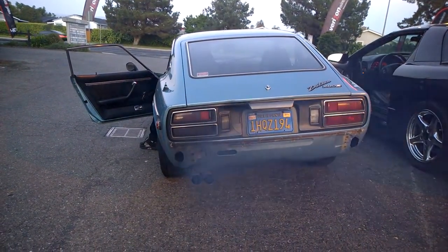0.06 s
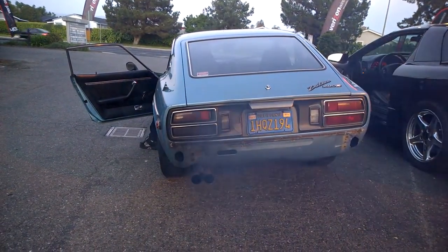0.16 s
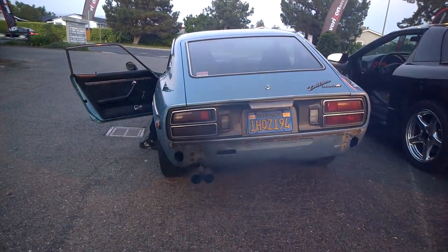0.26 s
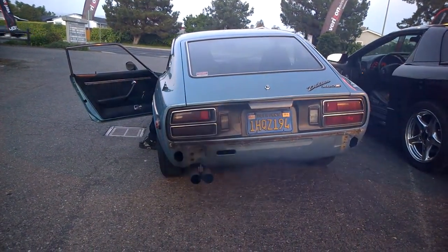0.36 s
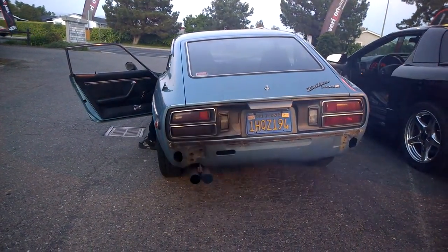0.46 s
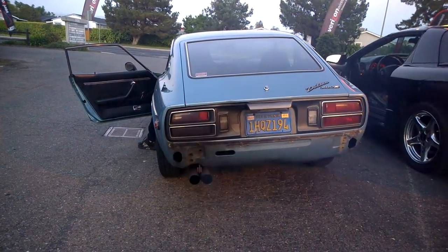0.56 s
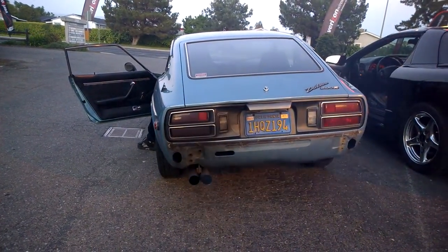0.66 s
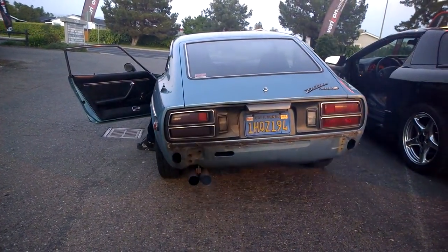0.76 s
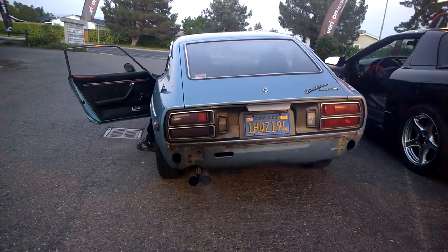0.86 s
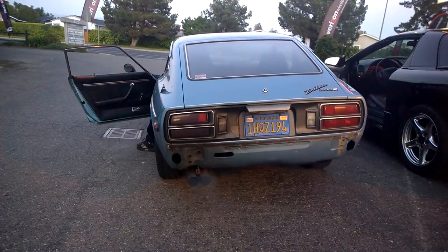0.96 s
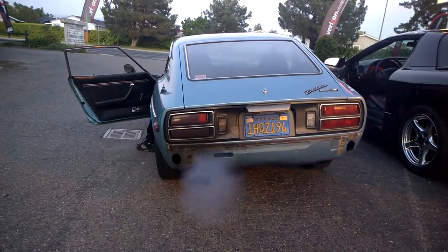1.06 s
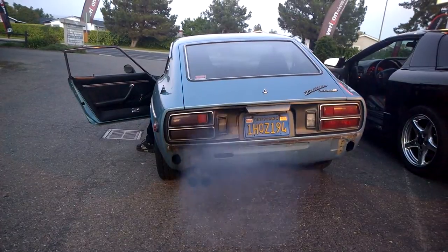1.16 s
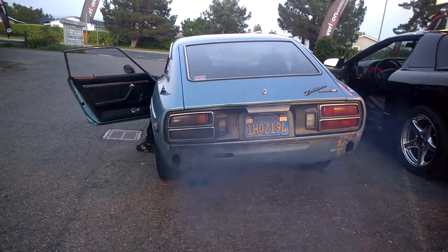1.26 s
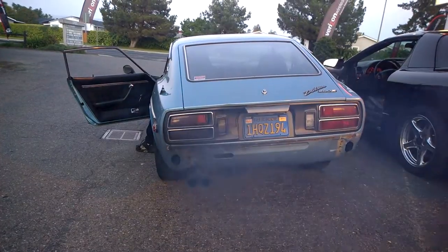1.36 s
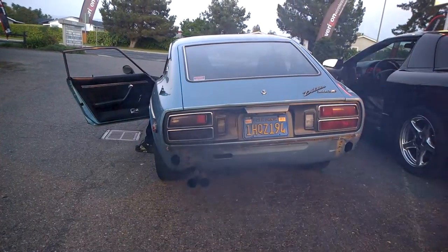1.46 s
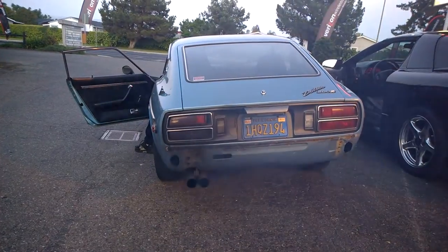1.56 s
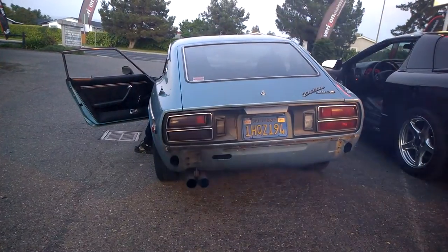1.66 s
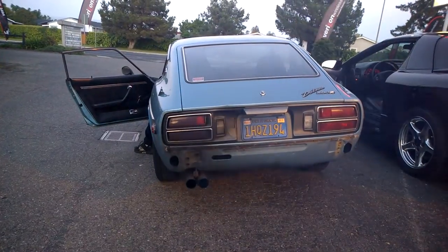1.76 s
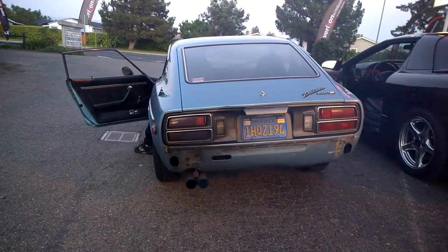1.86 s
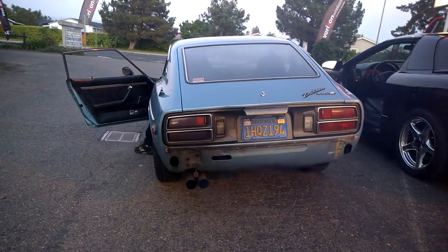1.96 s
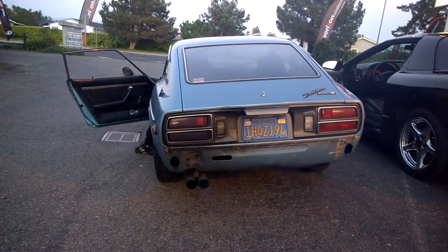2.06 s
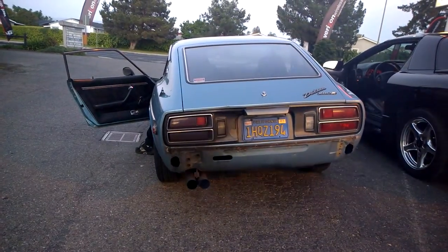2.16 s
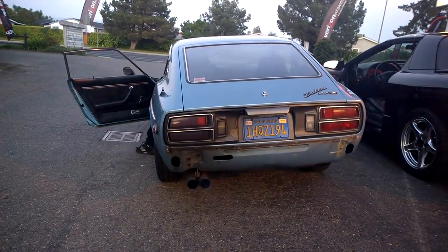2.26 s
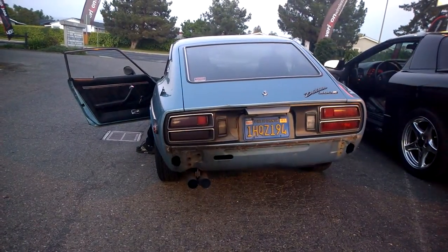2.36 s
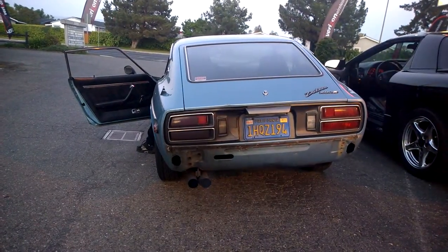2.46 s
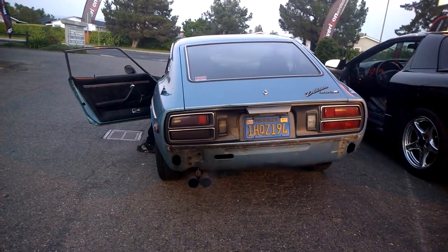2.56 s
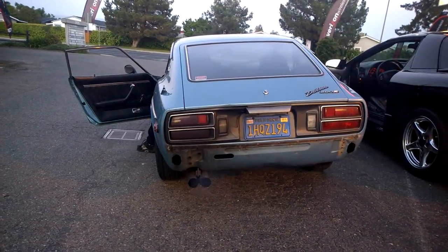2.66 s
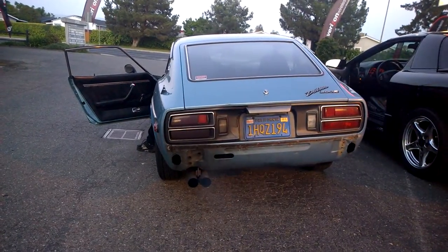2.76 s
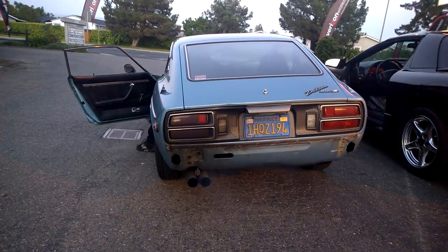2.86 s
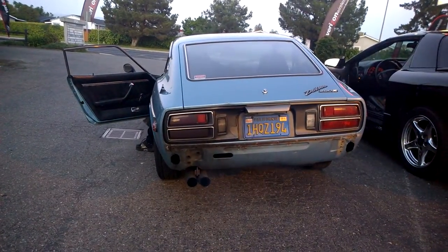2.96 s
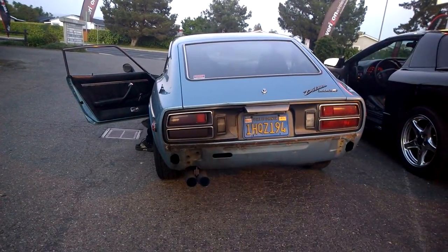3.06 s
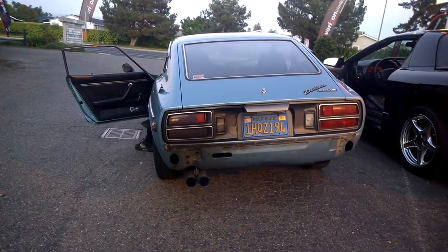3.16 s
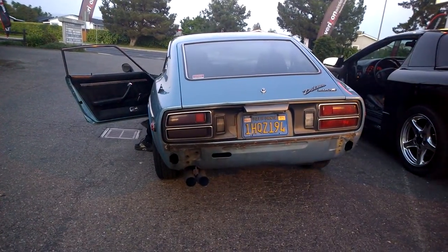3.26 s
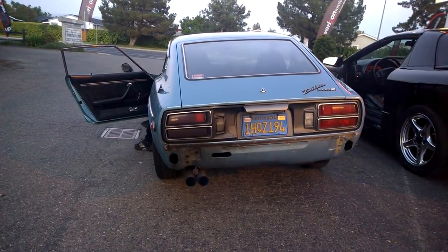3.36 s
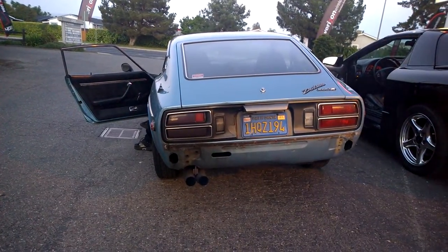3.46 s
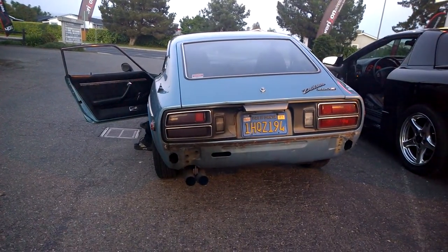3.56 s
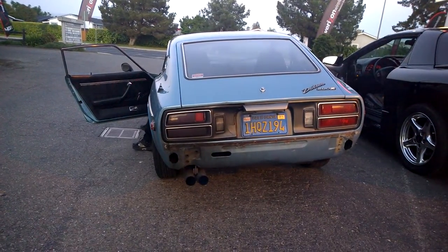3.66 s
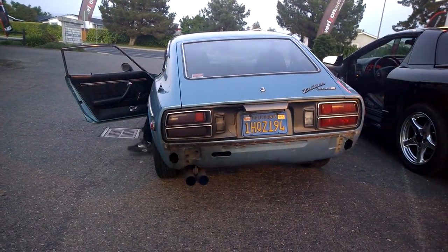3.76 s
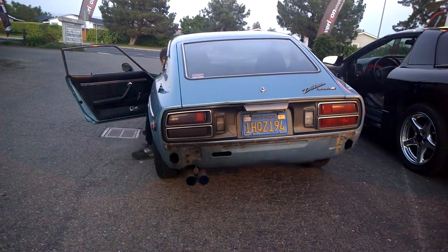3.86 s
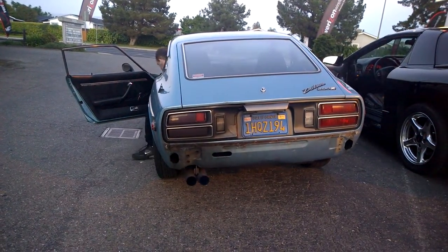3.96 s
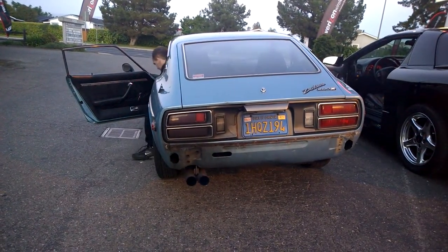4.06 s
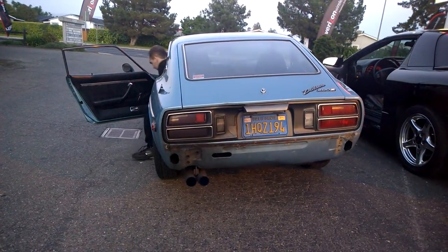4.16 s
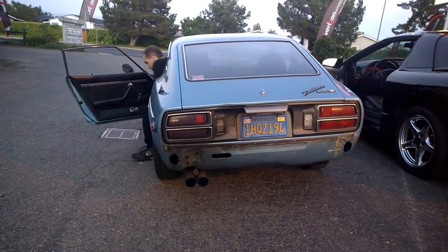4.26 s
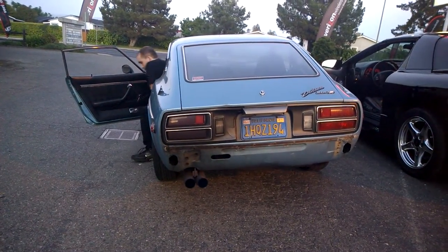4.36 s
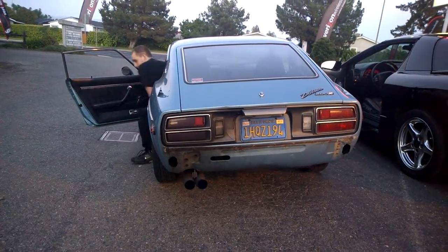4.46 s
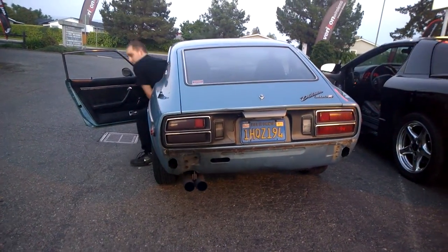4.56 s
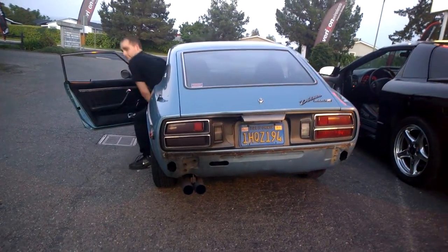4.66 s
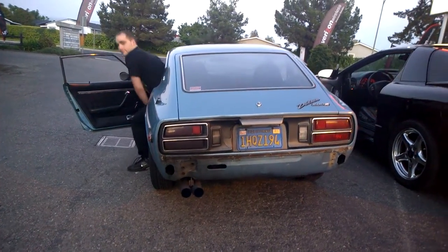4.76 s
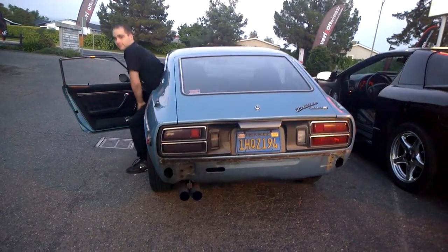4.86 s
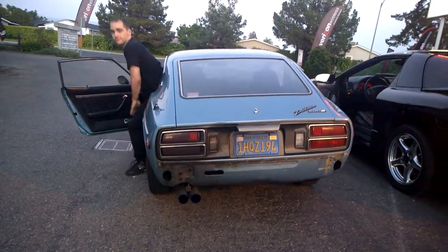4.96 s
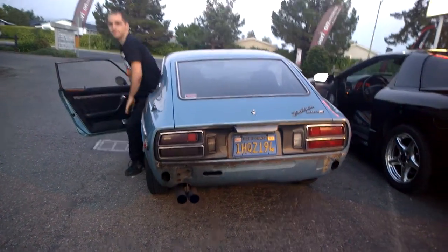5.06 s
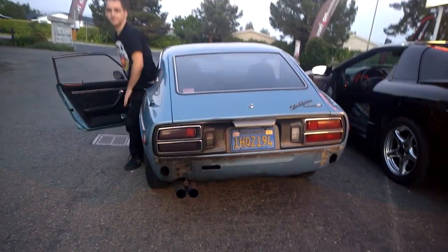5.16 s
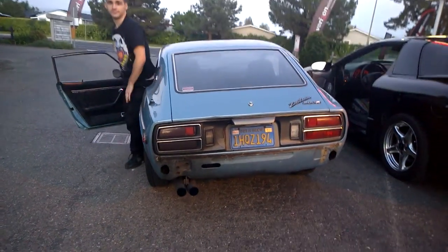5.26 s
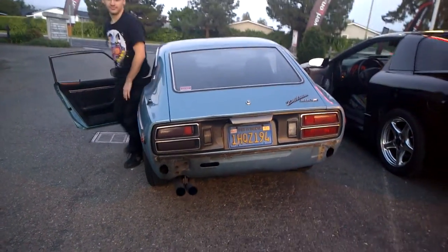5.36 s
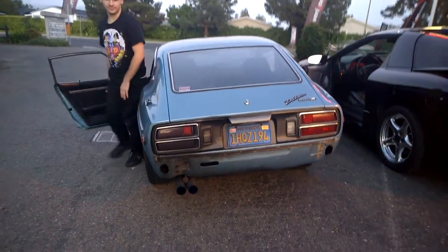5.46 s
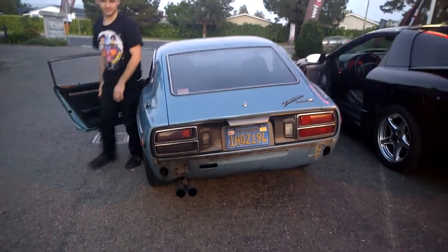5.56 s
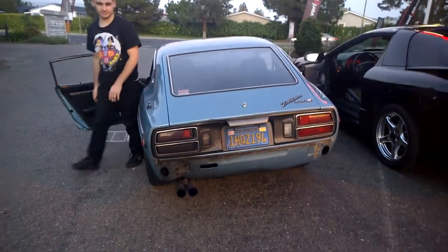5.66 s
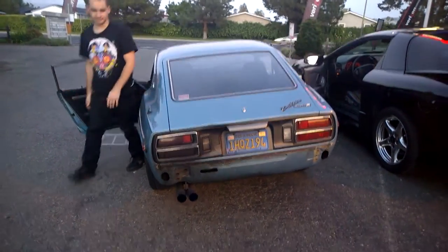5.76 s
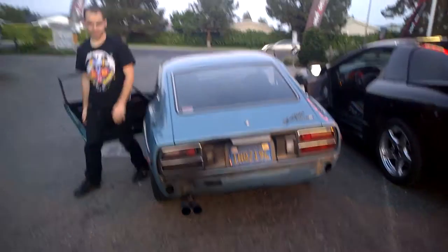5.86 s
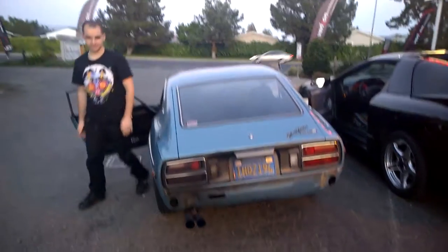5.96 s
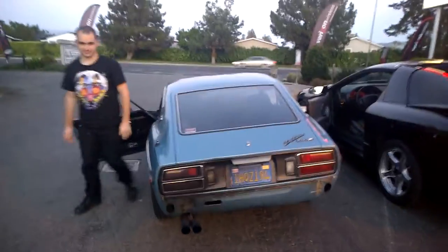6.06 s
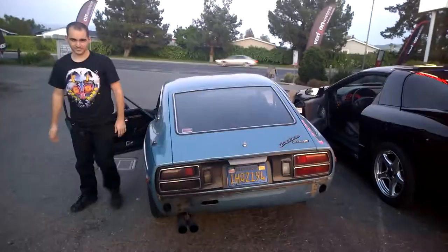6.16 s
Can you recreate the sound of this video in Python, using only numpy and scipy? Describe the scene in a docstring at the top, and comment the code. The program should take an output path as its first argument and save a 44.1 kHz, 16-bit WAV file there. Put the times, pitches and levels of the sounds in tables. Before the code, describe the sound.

Outdoors in a parking area, close behind a car with an open six-cylinder exhaust. At 0 s a rev is already ending with hard thumps and crackly pops until about 0.2 s; its raspy, hollow tone slides down to 0.95 s. A second blip then swells and barks, pitch climbing to about 1.3 s, with gritty tailpipe ringing, chopped gas hiss and a cluster of cracks around 1.15-1.25 s. Two more pops come near 1.45 s. From 1.5 to 2.5 s a smooth drone glides down through resonances. Around 2.6-2.9 s it turns rough, with dull pops and a bright loose rattle peaking near 2.8 s; another pop at 3.4 s. From 3.1 s a deep, lumpy idle throbs, slowing and softening to 6.2 s. Faint bright scuffs tick from 3 s, and a fluttering clothing rustle rises quietly after 5.7 s over bassy outdoor air.

```python
"""Sports car exhaust, parking area

A six-cylinder sports car with an open exhaust, heard from behind: one throttle blip dies away, a second
barks, the engine winds down with a smooth drone and scattered pops, then settles into a slow, lumpy idle.
Crank speed drives order tones, firing pulses that ring pipe resonances, and gas noise gated by the firings.
A loose rattle, scuffs, a rustle of clothing and a quiet outdoor bed are shaped noise."""
import sys
import numpy as np
from scipy import signal
from scipy.fft import rfft, irfft
from scipy.io import wavfile
from scipy.ndimage import uniform_filter1d

SR = 44100
rng = np.random.default_rng(int(sys.argv[2]) if len(sys.argv) > 2 else 0)


def store_wav(level_fs):
    """Save 16-bit WAV to argv[1]."""
    pcm = np.round(np.clip(np.atleast_2d(level_fs), -1, 1) * 32767)
    wavfile.write(sys.argv[1], SR, pcm.T.astype(np.int16))


N = 273420
TIME = np.arange(N) / SR


def from_db(db):
    """Decibels to amplitude gain."""
    return 10 ** (np.asarray(db) / 20)


def summed_db(*gains):
    """Level of unrelated sounds together: their powers add."""
    return 10 * np.log10(sum(g ** 2 for g in gains))


def rms_one(x):
    """Scale to unit power."""
    return x / np.sqrt(np.mean(x ** 2) + 1e-20)


def in_time(rows):
    """Interpolate each column after the time column at every sample."""
    s, *columns = np.transpose(rows)
    return [np.interp(TIME, s, c) for c in columns]


def at_hz(points, hz):
    """Read a spectrum on a log-frequency axis."""
    point_hz, value = np.array(points).T[:2]
    return np.interp(np.log(hz + 1e-3), np.log(point_hz), value)


def butter(x, hz, kind, order=2):
    """Causal Butterworth filter."""
    return signal.sosfilt(signal.butter(order, hz, kind, fs=SR, output="sos"), x)


def drift(hz):
    """Low-passed chance with unit power."""
    return rms_one(butter(rng.standard_normal(N + SR), hz, "low")[SR:])


def evened(x, seconds):
    """Divide by the running RMS to hold the power near 1."""
    power = np.mean(np.atleast_2d(x) ** 2, axis=0)
    running = np.abs(uniform_filter1d(power, int(seconds * SR)))
    return x / np.sqrt(running + 1e-6 * power.mean())


# left-right likeness of noise: freq_hz, likeness_0_to_1
STEREO_LIKENESS = [(100, 1), (500, 0.86), (1000, 0.12), (2000, 0.37), (4000, 0.28), (8000, 0.051),
                   (12000, .1)]


def noise(spectrum):
    """Coloured stereo noise, rolled off at both ends; width follows the likeness of left and right."""
    hz = np.arange(N // 2 + 1) * SR / N
    low_hz, high_hz = spectrum[0][0], spectrum[-1][0]
    skirts = 1 / (1 + (hz / high_hz) ** 12) / (1 + (low_hz / (hz + 1)) ** 4)
    mid, side = rfft(rng.standard_normal((2, N))) * from_db(at_hz(spectrum, hz)) * skirts
    alike = np.clip(at_hz(STEREO_LIKENESS, hz), 0, 1)
    mid = irfft(np.sqrt(1 + alike) * mid, N)
    side = irfft(np.sqrt(1 - alike) * side, N)
    return (mid + side * [[1], [-1]]) / np.std(mid)


def resonate(x, modes, alternate=True):
    """Parallel two-pole resonances; along a pipe their signs alternate."""
    out = 0
    for k, (hz, width_hz, db) in enumerate(modes):
        r = np.exp(-np.pi * width_hz / SR)
        sign = (-1) ** k if alternate else 1
        poles = [1, -2 * r * np.cos(2 * np.pi * hz / SR), r * r]
        ring = signal.lfilter([1, 0, -1], poles, x + 1e-18)
        out = out + sign * from_db(db) * (1 - r * r) / 2 * ring
    return out


def disperse(x, hz, width_hz, count=5):
    """A chain of all-passes: the muffler's chambers hold the tones near hz back."""
    r = np.exp(-np.pi * width_hz / SR)
    a = [1, -2 * r * np.cos(2 * np.pi * hz / SR), r * r]
    return signal.sosfilt([a[::-1] + a] * count, x)


def clicks(seconds, sizes):
    """Single-sample impulses."""
    out = np.zeros(N)
    out[np.clip(np.round(seconds * SR).astype(int), 0, N - 1)] = sizes
    return out


def play(seconds, db, shape):
    """Repeat one peak-1 shape at given moments and levels."""
    return signal.fftconvolve(clicks(seconds, from_db(db)), shape / np.abs(shape).max())[:N]


def envelope(start_s, attack_s, hold_s, release_s, curve=1):
    """Rise, hold and exponential release; top 1."""
    age = TIME - start_s
    rise = np.clip(age / attack_s, 0, 1) ** curve
    return rise * np.exp(-np.maximum(age - attack_s - hold_s, 0) / release_s)


# outdoor bed spectrum: freq_hz, density_db_per_hz
OUTDOOR_SPECTRUM = [(15, -5.5), (35, -5), (100, 0.5), (300, -8), (520, -31.5), (800, -34), (1100, -39),
                    (1500, -52.5), (4000, -57.5), (6500, -57.5), (9000, -78), (16000, -71)]


def outdoor_air():
    """Steady, bass-heavy background noise."""
    return from_db(-37.5) * noise(OUTDOOR_SPECTRUM)


# clothing as the driver walks past: time_s, relative_level_db
RUSTLE_LEVEL = [(5.5, -100), (5.78, -83), (5.95, -82.5), (6.08, -80), (6.2, -74.5)]
# bright rustle spectrum: freq_hz, density_db_per_hz
RUSTLE_SPECTRUM = [(1000, -2.5), (1500, -8), (2300, -2), (3500, -28.5), (4800, -10.5), (5500, 8.5),
                   (6300, -12.5), (8000, -33)]
# dull swish of cloth: freq_hz, density_db_per_hz
SWISH_SPECTRUM = [(450, 1), (800, -4.5), (1400, -4.5), (2400, -11.5)]
FLUTTER_HZ, FLUTTER_DB = 16, 4


def clothing():
    """Cloth friction: a fluttering bright rustle over a dull swish."""
    level_db, = in_time(RUSTLE_LEVEL)
    flutter_db = FLUTTER_DB * np.sin(2 * np.pi * FLUTTER_HZ * TIME + drift(5)) + 3 * drift(25)
    rustle = from_db(level_db - 1 + flutter_db) * noise(RUSTLE_SPECTRUM)
    swish = from_db(level_db + 7.5) * noise(SWISH_SPECTRUM)
    return rustle + swish


def ticks(rows, band, length_s, gain_db):
    """Brief swells of bright noise; each swell peaks length_s after its start."""
    s, db = np.transpose(rows)[:2]
    age = TIME[:SR // 10] / length_s
    return play(s, db + gain_db, age * np.exp(-age)) * noise(band)


SHUFFLE_FROM_S, SHUFFLE_DB = 2.9, -65.5   # level before the tick gains


def shuffling(spread_db, count=18):
    """Faint scuffs at loose intervals as the driver climbs out: rows start_s, relative_level_db."""
    when, size = rng.random((count, 2)).T
    s = SHUFFLE_FROM_S + (TIME[-1] - SHUFFLE_FROM_S) * (np.arange(count) + when) / count
    return np.column_stack([s, SHUFFLE_DB + spread_db * (2 * size - 1)])


# level before the tick gains, highest at the peak time
RATTLE_PEAK_S, RATTLE_DB, RATTLE_RISE_DB_PER_S, RATTLE_FALL_DB_PER_S = 2.8395, -58, 11.5, 12


def rattle(phase, spread_db):
    """A loose part ticks once a revolution, strongest at its resonance: rows start_s, relative_level_db."""
    turns = (phase - np.interp(RATTLE_PEAK_S, TIME, phase)) / 3   # three firings a revolution
    s = TIME[np.flatnonzero(np.diff(np.floor(turns)) > 0)]
    late_s = s - RATTLE_PEAK_S
    db = RATTLE_DB - np.maximum(-RATTLE_RISE_DB_PER_S * late_s, RATTLE_FALL_DB_PER_S * late_s)
    return np.column_stack([s, db + spread_db * np.resize(rng.standard_normal(size=200), len(s))])


# clearest scuffs and ticks around the car: start_s, relative_level_db
CLEAR_SCUFFS = [(3.5721, -62), (4.1593, -61.5), (4.257, -60.5), (4.4587, -66), (4.5653, -62),
                (4.6113, -59.5), (4.9444, -62), (5.066, -67), (5.119, -62), (5.3981, -62), (5.6601, -66),
                (6.0505, -63)]
# rattle spectrum: freq_hz, density_db_per_hz
RATTLE_SPECTRUM = [(3000, -20), (4900, -4.5), (6500, -18.5), (7800, 3), (9500, -22), (11800, -8.5),
                   (13800, -21.5), (15500, -12.5)]
# scuff spectrum: freq_hz, density_db_per_hz
SCUFF_SPECTRUM = [(2000, -35), (3700, 0.5), (5400, 3.5), (7000, -9), (10000, -18.5)]


def loose_parts(phase):
    """Noise ticks: the rattle with a buzzing tail, and scuffs with a faint bright edge."""
    knocks = rattle(phase, spread_db=2.0)
    scuffs = np.vstack([CLEAR_SCUFFS, shuffling(spread_db=1, count=26)])
    out = ticks(knocks, RATTLE_SPECTRUM, length_s=.003, gain_db=-3.5)
    out = out + ticks(knocks, RATTLE_SPECTRUM, length_s=.012, gain_db=-15.5)
    out = out + ticks(scuffs, SCUFF_SPECTRUM, length_s=.005, gain_db=-9)
    return out + ticks(scuffs, RATTLE_SPECTRUM, length_s=.0015, gain_db=-15.5)


# engine bay whirr spectrum: freq_hz, density_db_per_hz
WHIRR_SPECTRUM = [(1400, -24), (1750, 3), (1950, -1), (2200, -10), (2700, -22)]


def engine_bay_whirr(level_db):
    """Narrow-band noise whose level follows engine speed."""
    return from_db(level_db - 1.5) * noise(WHIRR_SPECTRUM)


# throttle blips: start_s, strength_db
THROTTLE_BLIPS = [(-.275, -2.5), (0.952, 0)]


def blips(attack_s, hold_s, release_s, curve):
    """Every throttle blip swells and dies in the same way."""
    return sum(from_db(db) * envelope(s, attack_s, hold_s, release_s, curve) for s, db in THROTTLE_BLIPS)


# throttle shut: speed_firings_per_s, rasp_relative_db, hiss_relative_db, whirr_relative_db
COASTING_LEVELS = [(23, -73, -81, -85), (28, -78, -77.5, -81), (39, -63, -74, -69.5), (58, -54.5, -64, -64),
                   (76, -51.5, -58.5, -70.5), (96.4, -45.5, -57.5, -56.5), (121, -44.5, -55, -58.5)]


def gas_flow(speed):
    """Rasp, hiss and whirr levels follow the speed; a blip adds a rasp and a shorter jet."""
    speeds, *columns = np.transpose(COASTING_LEVELS)
    rasp_db, hiss_db, whirr_db = [np.interp(speed, speeds, c) for c in columns]
    bark = from_db(-27.5) * blips(attack_s=.16, hold_s=0.13, release_s=0.025, curve=1.35)
    jet = from_db(-37.0) * blips(attack_s=0.21, hold_s=.04, release_s=0.037, curve=1.85)
    return summed_db(from_db(rasp_db), bark), summed_db(from_db(hiss_db), jet), whirr_db


# rushing gas spectrum: freq_hz, density_db_per_hz
HISS_SPECTRUM = [(500, -32.5), (750, 1), (1150, 7.5), (1500, -3), (1900, 4.5), (2600, -4.5), (3600, -3),
                 (4300, -7.5), (4900, -2.5), (6300, -12.5), (8000, -12.5), (9700, -20), (12000, -18),
                 (14000, -26), (16000, -21.5)]
# open-throttle jet and pop spray spectrum: freq_hz, density_db_per_hz
BARK_SPECTRUM = [(700, -21.5), (1250, -12.5), (1500, -11), (1880, 4), (2500, -11.5), (3100, -6.5),
                 (3700, -3), (4600, -10.5), (5100, -12), (7000, -21), (9700, -32), (11800, -27.5),
                 (15000, -36)]


def hiss(gate, level_db):
    """Rushing gas; under open throttle it turns into a jet chopped by the firings."""
    throttle = np.clip((level_db + 53) / 8, 0, 1)   # opening inferred from the flow level
    rush = noise(HISS_SPECTRUM) * (0.65 + 0.079 * gate) * from_db(5.5 + 0.49 * drift(40))
    jet = noise(BARK_SPECTRUM) * gate * from_db(2.0 + 1.0 * drift(150))
    return from_db(level_db) * (np.sqrt(1 - throttle) * rush + np.sqrt(throttle) * jet)


# short standing waves of the tailpipes: freq_hz, width_hz, gain_db
TAILPIPE_MODES = [(702.3, 9.3, 4), (744, 56, 2.5), (799, 69, -3.5), (920, 11, -7), (995, 15, -1),
                  (1050, 22, -14.5), (1850, 88, -26)]


def rasp(pulses, gate, level_db, turbulence):
    """Pulse edges and puffs of turbulence ring the tailpipes."""
    gas = rms_one(pulses) + turbulence * gate * noise([(300, 0.0074), (3000, 0.0017)])
    ring = butter(resonate(gas, TAILPIPE_MODES, alternate=False), 400, "high", order=3)
    return from_db(level_db + 1.0) * evened(ring, seconds=0.051)


# long standing waves of the exhaust: freq_hz, width_hz, gain_db
PIPE_MODES = [(42, 32, -14.5), (62.8, 5.5, 4.5), (107.6, 14, -9.5), (148.4, 8.3, -4), (203, 13, -13),
              (263.4, 7.3, -7.5), (312.8, 13, -15), (380, 9.8, -15.5), (459.3, 8.1, -21)]
# hard firings and afterfire: start_s, thump_db, tailpipe_ring_db, crack_db
POP_EVENTS = [(.002, -26, -35, -20), (.018, -11, -18, -35), (0.081, -26, -32, -43), (0.125, -20, -35, -47),
              (.162, -11.5, -30.5, -39), (0.185, -19, -37, -40), (.992, -27, -32.5, -44),
              (1.067, -10.5, -28, -41), (1.141, -21, -14, -19), (1.171, -16, -22.5, -35),
              (1.195, -10, -12, -20), (1.222, -7, -10.5, -26), (1.248, -9, -10.5, -17),
              (1.275, -33, -22.5, -38), (1.449, -9.5, -24, -29), (1.484, -13.5, -31.5, -42),
              (2.592, -11, -31.5, -37.5), (2.798, -15.5, -37.5, -47), (2.886, -14, -37.5, -40),
              (3.196, -19, -55, -55), (3.370, -10, -36, -28), (6.103, -24, -58, -56)]
# the pipe's answer to a pop: freq_hz, width_hz, gain_db
THUMP_MODES = [(99, 43, 10), (175, 21, 7), (267, 150, 1.5), (373, 30, -27)]


def pops(crack_s, spit, boom):
    """Fuel goes off hard in the pipe: a thump that booms on, ringing tailpipes and a short crack."""
    s, thump_db, ring_db, crack_db = np.transpose(POP_EVENTS)
    t = TIME[:SR // 5]
    blow = 1. * (t == 0)
    thump = resonate(blow, THUMP_MODES, alternate=False) + boom * resonate(blow, PIPE_MODES)
    thump = butter(thump, 320, "low", order=4)
    ring = butter(resonate(blow, TAILPIPE_MODES, alternate=False), 1100, "low", order=4)
    ring = butter(ring, 440, "high", order=4)
    crack = butter(resonate(blow, [(626, 110, -0.5), (1180, 220, 1)]), 1100, "low", order=3)
    spray = spit * play(s, crack_db, np.exp(-t / crack_s)) * noise(BARK_SPECTRUM)
    return play(s - .001, thump_db, thump) + play(s, ring_db, ring) + play(s, crack_db, crack) + spray


# what the exhaust passes of the upper orders: freq_hz, gain_db
OVERTONE_RESPONSE = [(280, 4), (350, 5.5), (400, 9), (430, -10.5), (465, 5.5), (510, -10.5), (580, -10),
                     (660, -23.5), (715, -9), (820, -3.5), (900, -10.5), (980, -9), (1150, -11.5),
                     (1450, -37.5)]


def overtones(phase, speed, level_db, waver, count=14):
    """Upper orders swell and fade as they glide through the exhaust's resonances."""
    fade = np.interp(TIME, [2.5, 3.0], [1, 0])
    wobble = phase + waver * drift(30)
    tones = 0
    for k in range(5, count + 1):
        tone = np.sin(2 * np.pi * (k * wobble + rng.random()))
        tones = tones + from_db(at_hz(OVERTONE_RESPONSE, k * speed)) * tone
    return from_db(level_db) * tones * fade


# how standing waves pass a low order, throttle shut: freq_hz, gain_db
COASTING_RESPONSE = [(47, -38.5), (56, -40), (63, -23), (70, -29), (79, -29), (86, -34), (98, -24),
                     (110, -27), (122, -29.5), (134, -22), (146, -18.5), (166, -26), (187, -36.5),
                     (205, -29.5), (228, -39.5), (262, -27.5), (292, -40), (312, -32), (330, -40.5),
                     (375, -34.5), (400, -38), (425, -49.5)]
# four lowest orders: coasting_db, load_db at LOAD_SPEED, load_slope_db_per_octave of speed
LOW_ORDER_LEVELS = [(2.5, -31, 4), (0.5, -7.5, -11), (-9.5, -20, -26.5), (-4.5, -22, -30.5)]
# speed where each coasting order is gone: firings_per_s
ORDER_GONE_SPEED = [42, 40.6, 49.3, 49]
LOAD_SPEED, BREAK_UP_RANGE = 84.5, 13.8   # firings per s


def drone(phase, speed, uneven, waver_db):
    """Lowest orders as clean tones: glide through standing waves, swell under load, fade out by idle."""
    load = blips(attack_s=0.13, hold_s=0.19, release_s=0.033, curve=1.3)
    out = 0
    orders = zip(LOW_ORDER_LEVELS, ORDER_GONE_SPEED)
    for k, ((coast_db, load_db, slope_db), gone) in enumerate(orders, 1):
        fade = np.clip((speed - gone) / BREAK_UP_RANGE, 0, 1)
        response_db = at_hz(COASTING_RESPONSE, k * speed)
        coasting = fade * from_db(coast_db + response_db + waver_db * uneven ** 2 * drift(11))
        pulling = load * from_db(load_db + slope_db * np.log2(speed / LOAD_SPEED))
        out = out + np.hypot(coasting, pulling) * np.sin(2 * np.pi * k * phase)
    return np.sqrt(2) * out


# spells of uneven firing: start_s, length_s, relative_level_db, dying_time_s
UNEVEN_SPELLS = [(0.018, 0.044, -20.5, 0.057), (0.152, 0.037, -25, 0.036), (0.953, 0.34, -31, 0.027),
                 (1.282, .07, -23, .04), (1.461, .03, -28, 0.029), (2.572, 0.22, -27, 0.48)]
# level between spells; unevenness of combustion 0-1
SMOOTH_BURBLE_DB, SMOOTH_UNEVEN, ROUGH_UNEVEN = -47.5, 0.38, 0.9


def combustion():
    """Level of the burble and unevenness of the firings; both rise in a rough spell."""
    spells = [(db, envelope(s, 0.02, length, dying)) for s, length, db, dying in UNEVEN_SPELLS]
    level_db = summed_db(from_db(SMOOTH_BURBLE_DB), *[from_db(db) * shape for db, shape in spells])
    rough = np.max([shape for _, shape in spells], axis=0)
    return level_db, SMOOTH_UNEVEN + (ROUGH_UNEVEN - SMOOTH_UNEVEN) * rough


# each cylinder in firing order, scaled by unevenness: strength_db
CYLINDER_STRENGTH = [8, 0.5, -9.5, 5.5, 0.7, -9.5]


def firings(phase, uneven, spread_db, jitter_s, count=6):
    """Gas pulses, unequal and ill-timed when combustion is poor; and their stumble about the cycle mean."""
    at = np.flatnonzero(np.diff(np.floor(phase)) > 0)
    chance = rng.standard_normal((600, 2))[:len(at)]
    strength_db = np.resize(CYLINDER_STRENGTH, len(at)) + spread_db * chance[:, 0]
    sizes = from_db(uneven[at] * strength_db)
    s = at / SR + jitter_s * uneven[at] * chance[:, 1]
    stumble = sizes - .75 * uniform_filter1d(sizes, count)   # removes most of the mean
    return clicks(s, sizes), clicks(s, stumble)


def eddying(pulses, churn):
    """Each pulse drags a short wake of turbulence behind it."""
    wake = signal.lfilter([1], [1, -np.exp(-1 / (0.0045 * SR))], pulses)   # 4.5 ms decay
    return rms_one(pulses) + churn * rms_one(wake * rng.standard_normal(N))


def burble(pulses, level_db, churn, muffler_hz, bass_hz):
    """Pulses and their eddies ring the long pipe."""
    ring = disperse(resonate(eddying(pulses, churn), PIPE_MODES), hz=298, width_hz=189)
    ring = butter(butter(ring, muffler_hz, "low", order=4), bass_hz, "high")
    return from_db(level_db) * evened(ring, seconds=0.18)


# deep resonances that carry the idle: freq_hz, width_hz, gain_db
IDLE_MODES = [(38.3, 7.6, -2), (53, 20.3, 1), (76.3, 11.3, 2.5), (101, 19.8, -4), (140.7, 18.5, -5),
              (207.5, 23, -12.5), (260.7, 15.4, -4.5), (315.7, 9, -20.5)]
# how idle orders come through the pipe: freq_hz, gain_db
IDLE_RESPONSE = [(45, -10), (60, -3.5), (70, -1), (85, -7.5), (105, -9.5), (125, -11.5), (148, -5),
                 (170, -12), (200, -18.5)]
# idle orders 2 to 6: strength_db
IDLE_STRENGTH = [1, -4, 0, -11.5, -1.5]
# the idle fades in, then grows quieter with time
IDLE_FROM_S, IDLE_FADE_S, IDLE_DB, IDLE_SAG_DB_PER_S = 3.1, 0.24, -28.5, -1.37


def lope(pulses, phase, speed, churn, throb_db, muffler_hz, beat_s, hunt_db):
    """Idle: deep resonances throb once a revolution over a few humming orders; the level hunts."""
    ring = disperse(resonate(eddying(pulses, churn), IDLE_MODES), hz=288.9, width_hz=124.6)
    ring = evened(butter(ring, muffler_hz, "low", order=5), seconds=0.24)
    revolution = (phase - np.interp(beat_s, TIME, phase)) / 3   # three firings a revolution
    hum = 0
    for k, db in enumerate(IDLE_STRENGTH, 2):
        tone = np.sin(2 * np.pi * (k * phase + rng.random()))
        hum = hum + from_db(db + at_hz(IDLE_RESPONSE, k * speed)) * tone
    throb = from_db(-2.5 + throb_db * np.cos(2 * np.pi * revolution))
    age = TIME - IDLE_FROM_S
    level_db = IDLE_DB + IDLE_SAG_DB_PER_S * age + hunt_db * drift(10)
    level = np.clip(age / IDLE_FADE_S, 0, 1) * from_db(level_db)
    return level * (throb * ring + np.sqrt(2) * from_db(1.0) * hum)


def car_park(x, echo_db):
    """The neighbouring car and the ground return dull echoes, different on each side."""
    dull = butter(x, 3000, "low", order=1)
    lags_s = [(.0093, .031), (.0127, .043)]   # left pair, right pair
    echoes = [sum(np.interp(TIME - lag, TIME, side, left=0) for lag in pair)
              for side, pair in zip(dull, lags_s)]
    return x + from_db(echo_db) * np.array(echoes)


# crank speed: time_s, firings_per_s
CRANK_SPEED = [(0, 115.3), (.14, 117), (.45, 98.9), (.91, 80.3), (1.0, 78), (1.08, 88.6), (1.17, 105.4),
               (1.24, 116.9), (1.32, 121.5), (1.52, 112), (1.73, 100.3), (2.3, 76.5), (2.6, 64.3),
               (3.0, 53.5), (3.5, 42), (4.15, 32.3), (4.7, 27.3), (5.3, 24.4), (6.2, 21.8)]


def scene():
    """Crank speed and throttle drive the exhaust layers; surroundings are added."""
    speed, = in_time(CRANK_SPEED)
    phase = np.cumsum(speed) / SR   # in firings
    burble_db, uneven = combustion()
    rasp_db, hiss_db, whirr_db = gas_flow(speed)
    pulses, stumble = firings(phase, uneven, spread_db=2.0, jitter_s=.0004)
    gate = rms_one(np.exp(.42 * np.cos(2 * np.pi * phase)))   # gas leaves in puffs
    low = drone(phase, speed, uneven, waver_db=2.5)
    low = low + overtones(phase, speed, rasp_db - 1.5, waver=0.012)
    low = low + burble(stumble, burble_db, churn=0.7, muffler_hz=465, bass_hz=62.6)
    low = low + lope(stumble, phase, speed, churn=0.48, throb_db=0.7, muffler_hz=308.8,
                     beat_s=4.799, hunt_db=1.25)
    low = low + pops(crack_s=0.01, spit=0.081, boom=0.75)
    high = rasp(pulses, gate, rasp_db - 5.0, turbulence=0.76) + hiss(gate, hiss_db)
    # lows lean slightly left, highs right
    exhaust = low * from_db([[.3], [-.3]]) + high * from_db([[-.3], [.3]])
    surroundings = outdoor_air() + clothing() + loose_parts(phase) + engine_bay_whirr(whirr_db)
    return car_park(exhaust, echo_db=-37.5) + surroundings


CUTOFF_HZ = 15800


def record(dry):
    """The microphone drops the deepest rumble, rounds the loudest peaks and cuts the top; 5 ms end fade."""
    x = butter(dry, 6.8, "high")
    x = x / (1 + (x / .8) ** 8) ** (1 / 8)
    x = x * np.clip((TIME[-1] - TIME) / .005, 0, 1)
    return signal.sosfilt(signal.ellip(10, .1, 90, CUTOFF_HZ, fs=SR, output="sos"), x)


dry = scene()
out = record(dry)
store_wav(out)
```